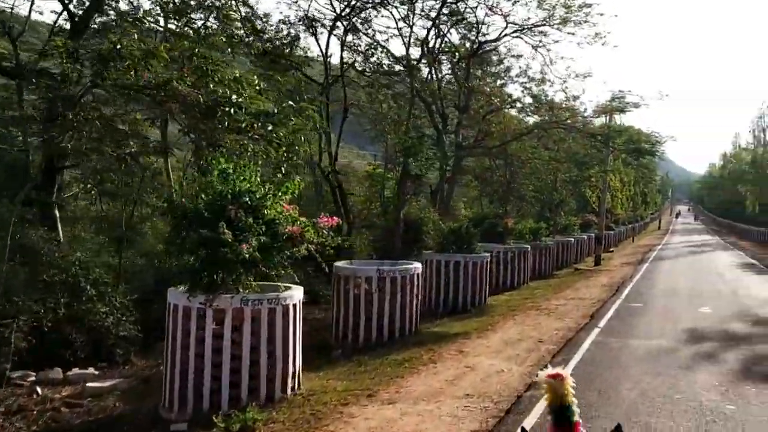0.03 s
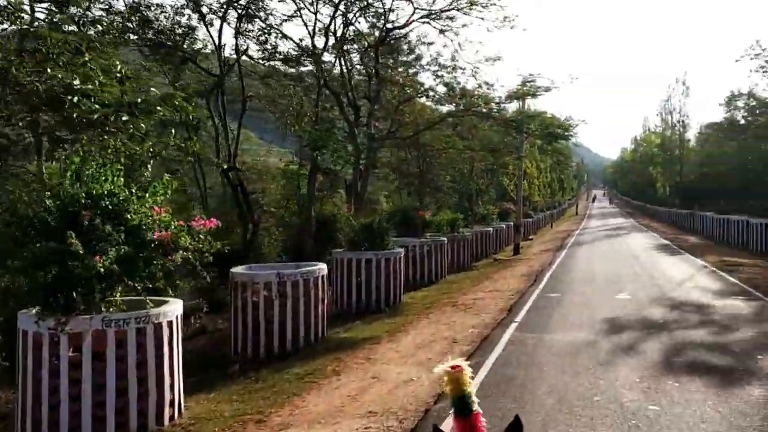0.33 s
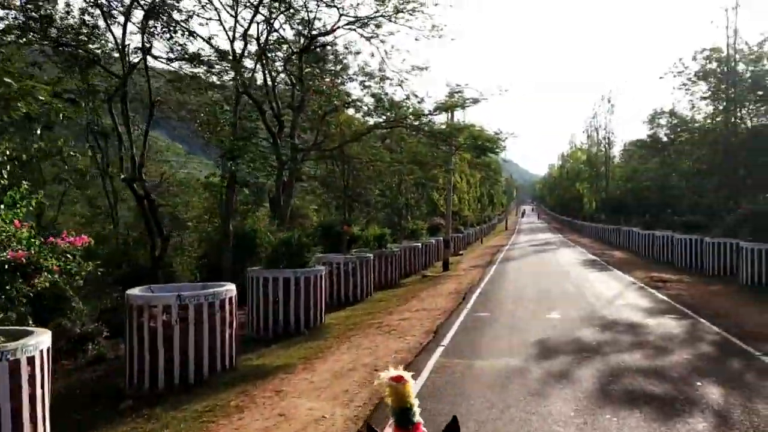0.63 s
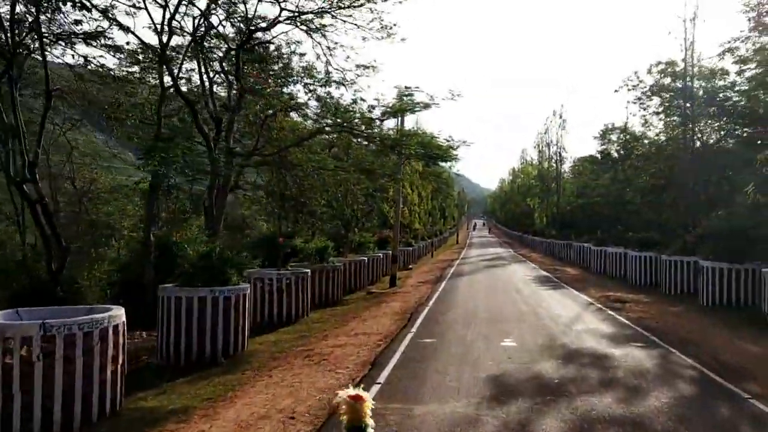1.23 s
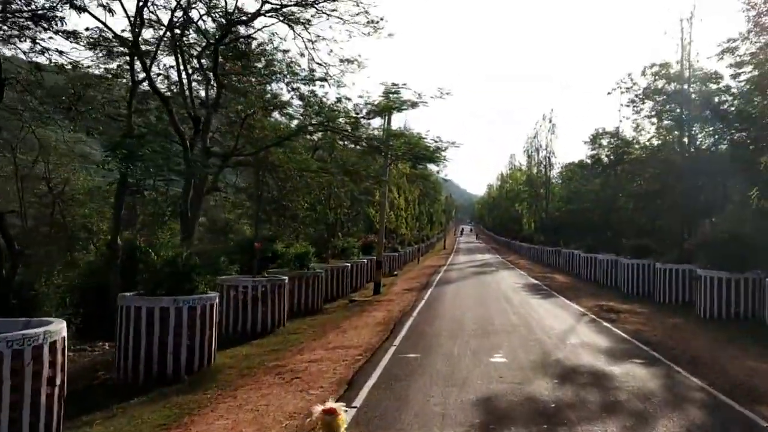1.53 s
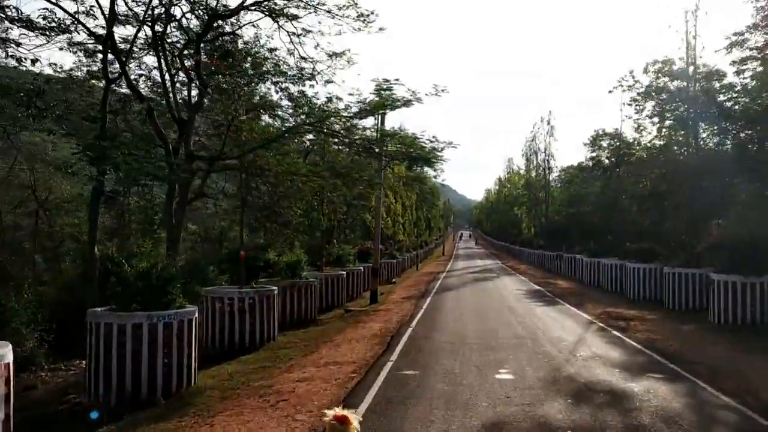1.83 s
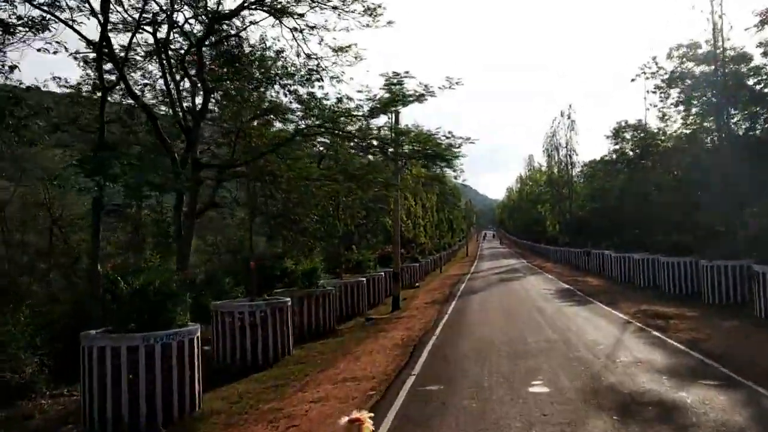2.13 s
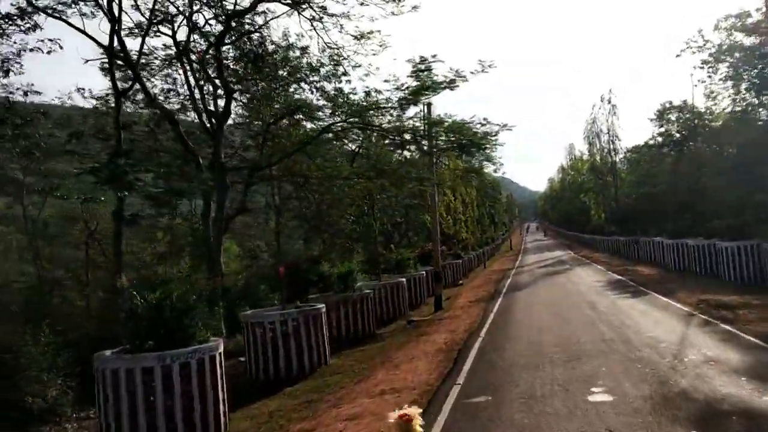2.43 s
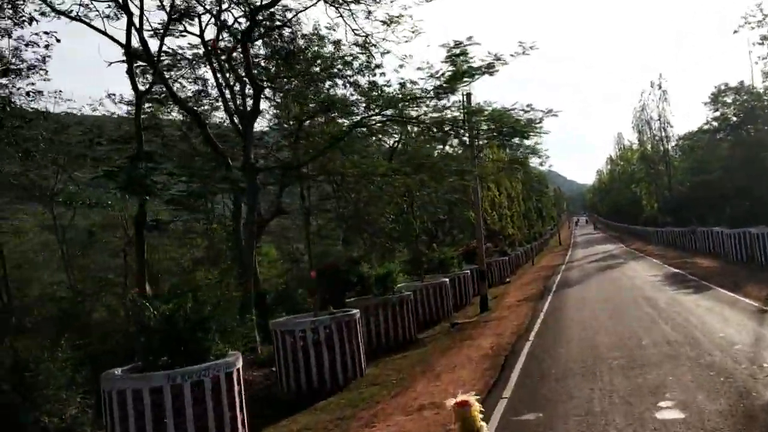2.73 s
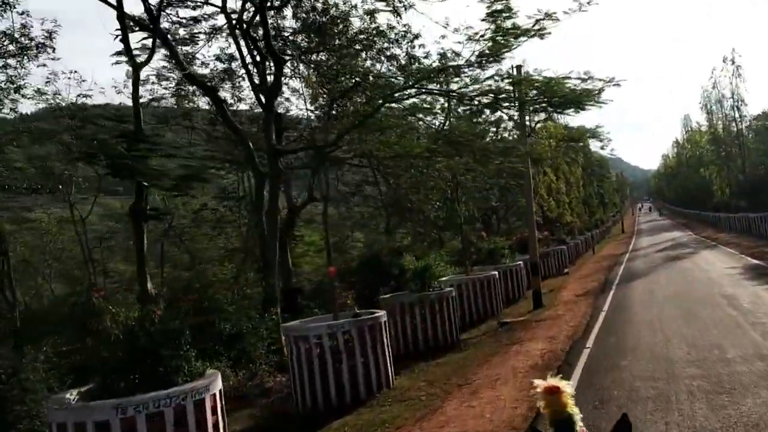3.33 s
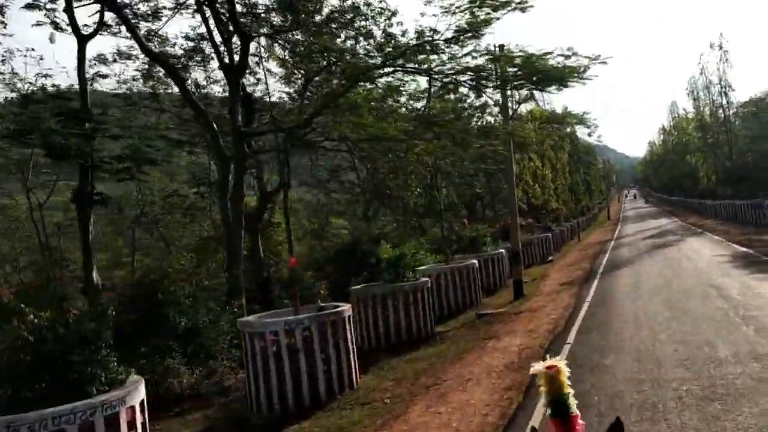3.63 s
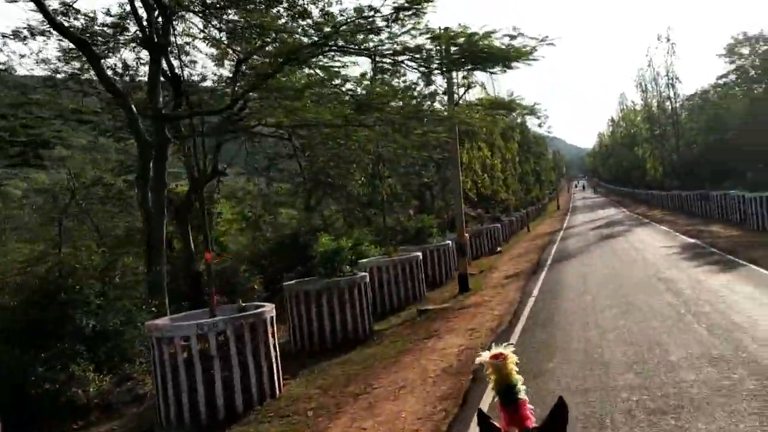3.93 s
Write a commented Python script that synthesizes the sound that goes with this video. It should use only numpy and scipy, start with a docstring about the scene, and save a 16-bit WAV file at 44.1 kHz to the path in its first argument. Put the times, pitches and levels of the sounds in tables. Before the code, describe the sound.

Harness bells jingle densely throughout, heard from a moving cart, with short, choked rings standing out from a shimmer of tiny bells. Dry hoofbeats trot steadily, nearly four a second, slightly left. Underneath, a faint rolling rumble and pulsing hum slowly sink, with two barely audible whines between 0.5 and 2 seconds. Bells clink hard together at about 2.9 seconds and again near 4 seconds.

```python
"""A draught animal trots along a paved road, heard from its cart. From the start the harness bells shake:
larger ones ring out and are choked as they touch again, over a dense jingle of tiny bells, with
rolling noise and a faint pulsing drone below. The hooves come straight in, each beat a cluster of dry
knocks. From half a second two faint whines swell and fade. Near three seconds, and again at the very
end, bell clinks hard against bell, while the road bed slowly sinks."""
import sys
import numpy as np
from scipy import signal
from scipy.fft import rfft, irfft, next_fast_len
from scipy.io import wavfile
from scipy.ndimage import uniform_filter1d, map_coordinates

SR = 44100
rng = np.random.default_rng(int(sys.argv[2]) if len(sys.argv) > 2 else 0)


def transcribe(u):
    """Save the signal u as a 16-bit wav file named by the first command-line argument.

    u: samples, shape (n,) or (channels, n), limited to [-1, 1]; the rate is SR.
    q: integer samples, one column per channel.
    """
    v = np.clip(np.atleast_2d(u).T, -1, 1)
    q = np.round(v * 32767).astype(np.int16)
    wavfile.write(sys.argv[1], SR, q)


N = 176400
T = np.arange(N) / SR


def amp(db):
    return 10 ** (np.asarray(db) / 20)


def unit(x):
    return x / np.sqrt(np.mean(np.abs(x) ** 2) + 1e-20)


def fade(t, t60):
    return np.exp(-np.log(1000) * t / t60)


def pan(left_db):
    return amp([[left_db / 2], [-left_db / 2]])


def wobble(rate):
    """A smooth random curve, rate knots a second."""
    return map_coordinates(rng.standard_normal(1024), [T * rate], mode="mirror")


def add(out, start_s, sound):
    """Drop a sound onto the track."""
    i = max(round(start_s * SR), 0)
    part = out[..., i:i + sound.shape[-1]]
    part += sound[..., :part.shape[-1]]


def coloured(x, eq):
    """x through an EQ curve of (frequency [Hz], gain [dB]), at rms 1."""
    hz, db = np.transpose(eq)
    f = np.fft.rfftfreq(N, 1 / SR)
    gain_db = np.interp(np.log(f + 1), np.log(hz), db, left=db[0] - 14, right=db[-1] - 31)
    return unit(irfft(rfft(x) * amp(gain_db), N))


def stereo_noise(width):
    mid, side = rng.standard_normal((2, N))
    return np.array([mid + width * side, mid - width * side])


# Fader ride of the shaking harness: (time [s], relative level [dB])
SHAKE_RIDE = [(0, -25.5), (.45, -26), (.62, -26), (1.33, -24.5), (1.41, -28.5), (1.5, -24), (1.91, -27.5),
              (2.35, -24.5), (2.52, -30), (2.65, -27.5), (3.3, -25.5), (4, -28.5)]


def shake_db():
    """How hard the harness shakes from moment to moment."""
    return np.interp(T, *np.transpose(SHAKE_RIDE))


def jostle(touches_per_s=45, swing_db=7, t60_s=0.22):
    """Envelope of a jostled bell: each contact retriggers the ring with a new size and phase."""
    touch = rng.random(N) < touches_per_s / SR
    age = T - np.maximum.accumulate(T * touch)
    size, phase = rng.standard_normal((2048, 2)).T
    onset = amp(swing_db * np.minimum(size, 1)) * np.exp(2j * np.pi * phase)
    return uniform_filter1d(onset[np.cumsum(touch)] * fade(age, t60_s), size=140)


# Bell strokes, loud and soft, that ring until choked: (time [s], free ring [s], relative level [dB])
STROKE_CUES = { "low": [(.143, 0.078, -28.5), (.782, 0.045, -18.5), (.932, 0.078, -30.5),
               (1.241, 0.057, -28.5), (1.55, 0.036, -28), (1.848, 0.018, -25), (2.595, 0.056, -26.5),
               (2.995, 0.12, -29.5), (3.79, 0.072, -32.5)], "middle": [(.027, 0.01, -21.5),
               (.293, 0.047, -27), (.585, 0.077, -28), (.843, 0.074, -27), (1.624, 0.1, -26.5),
               (1.939, 0.085, -28), (2.094, .03, -28), (2.17, 0.096, -26.5), (2.768, 0.061, -24.5),
               (3.03, 0.066, -32), (3.265, 0.021, -37), (3.57, 0.3, -37), (3.87, 0.12, -31)],
               "upper": [(1.226, 0.027, -23), (1.7, 0.078, -26.5), (2.277, 0.041, -20.5),
               (3.91, 0.045, -25.5)], "clear": [(.52, 0.046, -26), (3.26, 0.088, -26.5)],
               "bright": [(.29, 0.036, -27), (.51, .15, -31), (.87, 0.047, -22.5), (1.11, 0.054, -23.5),
               (1.446, 0.037, -19.5), (1.606, 0.083, -51), (2.172, 0.09, -17), (2.66, 0.095, -28.5),
               (2.945, 0.073, -26.5), (3.44, 0.51, -31)], "sharp": [(.21, 0.013, -16), (.675, 0.02, -12.5),
               (1.015, 0.035, -15.5), (2.35, 0.077, -17.5), (2.975, 0.03, -18.5)]}
# Brief tinkles, per bell: (relative level [dB], times [s])
TINKLE_CUES = {"dull": (-31.5, [.94, 1.848, 2.05, 2.417, 2.575]),
               "small": (-21, [.558, .699, .725, .987, 1.332, 1.56, 1.851, 2.048, 2.128, 2.319, 2.42, 2.79, 2.868, 2.946, 3.22, 3.855]),
               "fine": (-21.5, [.38, .79, .928, 1.245, 3.325, 3.425, 3.492]),
               "tiny": (-27, [1.33, 1.53, 1.575, 2.172, 2.28, 2.64, 2.775, 3.35, 3.759])}


def strokes(name, tinkle_s=0.023):
    """One bell's strokes and tinkles as (time [s], free ring [s], relative level [dB])."""
    db, times = TINKLE_CUES.get(name, (0, []))
    return STROKE_CUES.get(name, []) + [(start, tinkle_s, db) for start in times]


# Ringing modes, per bell: (frequency [Hz], relative level [dB])
BELL_MODES = { "low": [(3332, 0), (6180, -17)], "dull": [(3580, 0)], "middle": [(3720, 0), (7994, -8),
              (5846, -22)], "upper": [(3887, 0), (11483, -9)], "thin": [(6903, 0), (5346, -12)],
              "clear": [(7235, 0), (7378, -4)], "bright": [(8479, 0), (4587, -26)], "sharp": [(8626, 0),
              (11057, -14)], "small": [(10084, 0), (12581, -9)], "fine": [(13157, 0), (13900, -5)],
              "tiny": [(15100, 0), (14912, -3), (15606, -2), (14680, -5)]}
# Place in the mix, per bell: (jostle level [dB], left over right [dB], left phase lead [rad])
BELL_MIX = {"low": (-36.5, -1.8, -1.24), "dull": (-44.5, -9, 0), "middle": (-34.5, -6.5, 0.85),
            "upper": (-37.5, -6, 1.5), "thin": (-38.5, 0, 0), "clear": (-31.5, -4.5, 2.82),
            "bright": (-29, -6, -0.98), "sharp": (-31, -1.8, -2.06), "small": (-31, 1.4, 0.75),
            "fine": (-33.5, 2.7, 2.1), "tiny": (-38, 2.6, -0.58)}


def bell(name, stroke_db=1.5, free_t60_s=2.2, choke_t60_s=0.045, detune_hz=4.9, sway_rad=0.76):
    """One harness bell: light jostling under strokes that ring freely, chatter and are choked."""
    jostle_db, pan_db, lead_rad = BELL_MIX[name]
    t = np.arange(SR // 3) / SR
    attack = 1 - np.exp(-t / 0.00025)
    chatter_pole = np.exp(-1 / (0.0059 * SR))  # smooths the chatter over about 6 ms
    shaking = amp(shake_db())
    out = np.zeros(N, complex)
    for hz, mode_db in BELL_MODES[name]:
        out += amp(jostle_db + mode_db) * unit(shaking * jostle()) * np.exp(2j * np.pi * hz * T)
        for start, free_s, db in strokes(name):
            detune, phase = rng.standard_normal(2)
            noise = rng.standard_normal(len(t)) + 1j * rng.standard_normal(len(t))
            chatter = 1 + 0.15 * unit(signal.lfilter([1], [1, -chatter_pole], noise))
            ring = attack * fade(t - free_s / 2, free_t60_s)
            choke = fade(np.maximum(t - free_s, 0), choke_t60_s)
            tone = np.exp(2j * np.pi * ((hz + detune_hz * detune) * t + phase))
            add(out, start, amp(stroke_db + db + mode_db) * ring * choke * chatter * tone)
    sway = np.exp(0.5j * (lead_rad + sway_rad * wobble(11)))  # the stereo image wanders
    return np.sqrt(2) * pan(pan_db) * np.array([out * sway, out / sway]).real


def tiny_bells(eq, width_rad, partials_per_s=2000, t60_s=0.075, spread_db=8):
    """A swarm of brief metal contacts, each ringing with pitches of its own."""
    t = np.arange(SR // 25) / SR
    count = int(partials_per_s * N / SR)
    when, pitch, size, phase, lag = rng.random((count, 5)).T[..., None]
    when = when[np.arange(count) // 3]  # three partials to a contact
    hz = eq[0][0] + pitch * (eq[-1][0] - eq[0][0])
    envelope = amp(spread_db * size ** 2) * fade(t, t60_s)
    samples = ((when * N).astype(int) + np.arange(len(t))).ravel()
    channels = []
    for side in (1, -1):
        grains = envelope * np.sin(2 * np.pi * (hz * t + phase) + side * width_rad * (2 * lag - 1))
        channels.append(np.bincount(samples, grains.ravel(), N)[:N])
    return coloured(np.array(channels), eq)


# Bright body of the tiny bells: (frequency [Hz], gain [dB])
JINGLE_EQ = [(2500, -16.5), (3500, -12.5), (4700, -22), (6400, -23.5), (7300, -6), (8900, 3.5),
             (9900, -1.5), (10800, -4), (12000, -6.5)]


def jingle(trim_db=2.5):
    """A wide, dense bed of tiny bells that rides the shake of the harness."""
    return amp(shake_db() + trim_db) * tiny_bells(JINGLE_EQ, width_rad=1.38)


# Airy top of the tiny bells: (frequency [Hz], gain [dB])
SPARKLE_EQ = [(11000, 2), (12000, -57), (12700, 13), (14300, 8), (16000, 5)]


def sparkle(trim_db=-3):
    """The highest bells glitter in jostled flurries, left of centre."""
    flurries = unit(np.abs(jostle()))
    return amp(shake_db() + trim_db) * flurries * pan(5) * tiny_bells(SPARKLE_EQ, width_rad=1.8)


def metal_noise():
    """Bright noise in the colour of the bells, the raw sound of a metal contact."""
    return coloured(stereo_noise(1), JINGLE_EQ) + 0.5 * coloured(stereo_noise(0.75), SPARKLE_EQ)


def ticks(pellets_per_s=22, pellet_db=8, clapper_db=-13, t60_s=0.015):
    """Loose pellets rattle in the bells, and the clapper ticks on every stroke and tinkle."""
    decay = fade(np.arange(SR // 10) / SR, t60_s)
    pellets = (rng.random(N) < pellets_per_s / SR) * rng.random(N) * amp(shake_db() + pellet_db)
    envelope = signal.fftconvolve(pellets, decay)[:N]
    for name in BELL_MIX:
        for start, _, db in strokes(name):
            add(envelope, start, amp(db + clapper_db) * decay)
    return envelope * metal_noise()


def drone(surge_db, pulse_hz=44, body_hz=256.4, jitter=0.0154, uneven_db=2):
    """Uneven pulses ring one low resonance, like a motor some way off."""
    t = np.arange(SR // 10) / SR
    cycles = np.floor(np.cumsum(pulse_hz * (1 + jitter * wobble(30))) / SR)
    pulses = np.diff(cycles, prepend=0) * amp(uneven_db * wobble(18) + surge_db)
    body = np.sin(2 * np.pi * body_hz * t) * fade(t, 0.022) * (1 - np.exp(-t / 0.017))
    return unit(signal.fftconvolve(pulses, body)[:N])


# Rumble of the cart on the paving: (frequency [Hz], gain [dB])
ROAD_EQ = [(25, -8), (95, -24), (200, 7), (450, 3), (900, -3), (2500, -5.5), (6000, -83)]


def rolling(road_db=-40, drone_db=-41.5, stride_s=0.555, peak_s=1.465, fade_db_per_s=1.25):
    """The low bed: road noise and drone swell once a stride and slowly sink."""
    surge_db = 3 * np.cos(2 * np.pi * (T - peak_s) / stride_s)
    hum = amp(drone_db) * drone(surge_db)
    road = amp(road_db + wobble(23) + surge_db / 2) * coloured(stereo_noise(0.54), ROAD_EQ)
    return (hum + road) * amp(-fade_db_per_s * (T - 1.5))  # the fader passes unity at 1.5 s


# Hoof contacts, toe and heel: (time [s], relative level [dB])
HOOF_CUES = [(.118, -17), (.130, -17), (0.187, -19.5), (.391, -15), (.405, -12), (0.673, -18),
             (.688, -14.5), (0.94, -21), (0.958, -13.5), (1.216, -19), (1.230, -17.5), (1.486, -13.5),
             (1.506, -12.5), (1.765, -15), (1.77, -18.5), (2.037, -11.5), (2.045, -13), (2.053, -40),
             (2.319, -12.5), (1.846, -30), (2.576, -19.5), (2.594, -16.5), (2.858, -23), (2.887, -17),
             (3.136, -17.5), (3.154, -11), (3.409, -21), (3.441, -21.5), (3.693, -16.5), (3.712, -13),
             (3.968, -19.5), (3.988, -23)]
# Modes of the hoof's knock: (frequency [Hz], relative level [dB])
KNOCK_MODES = [(900, -11.5), (1170, -1), (1480, -7)]
# Grit under the hoof: (frequency [Hz], gain [dB])
SCUFF_EQ = [(200, -5), (600, -14.5), (1250, -2), (2000, -8.5), (5000, -17.5)]


def hooves(knock_db=1.5, knock_t60_s=0.012, scuff_db=-12, scuff_t60_s=0.07, pitch_scatter=0.042):
    """Each contact with the paving is a dead knock with a short gritty scuff, left of centre."""
    t = np.arange(SR // 6) / SR
    knock_envelope = fade(t, knock_t60_s) * (1 - np.exp(-t / 0.00017))
    knocks, scuff_envelope = np.zeros((2, N))
    for start, db in HOOF_CUES:
        pitches = np.exp(pitch_scatter * rng.standard_normal(len(KNOCK_MODES)))
        ring = sum(amp(mode_db) * np.sin(2 * np.pi * hz * pitch * t)
                   for (hz, mode_db), pitch in zip(KNOCK_MODES, pitches))
        add(knocks, start, amp(db + knock_db) * ring * knock_envelope)
        add(scuff_envelope, start, amp(db + scuff_db) * fade(t, scuff_t60_s))
    knocks = signal.sosfilt(signal.butter(2, 550, "high", fs=SR, output="sos"), knocks)
    scuffs = uniform_filter1d(scuff_envelope, size=500) * coloured(stereo_noise(0.31), SCUFF_EQ)
    return pan(6.5) * (knocks + scuffs)


# Faint tones over the road noise: (time [s], length [s], frequency [Hz], level [dB])
WHINE_CUES = [(0.507, 1.37, 730, -54), (.74, 0.18, 469, -41.5)]


def whines():
    """Thin tones that swell and fade at a steady pitch."""
    out = np.zeros(N)
    for start, length, hz, db in WHINE_CUES:
        t = np.arange(int(length * SR)) / SR
        swell = np.sqrt(2 * np.sin(np.pi * t / length))
        add(out, start, amp(db) * swell * np.sin(2 * np.pi * hz * t))
    return out


# Hard accents of bell against bell: (time [s], level [dB])
CLINK_CUES = [(2.868, -8), (3.11, -23), (3.984, -13)]


def clinks(ping_hz=9350, ping_t60_s=0.079, tick_db=-20, tick_t60_s=0.015):
    """Two bells collide: a high ping with a tick of noise on its attack."""
    t = np.arange(SR // 10) / SR
    ping = fade(t, ping_t60_s) * np.sin(2 * np.pi * ping_hz * t + [[0], [1]])  # right leads by 1 rad
    pings, tick_envelope = np.zeros((2, N)), np.zeros(N)
    for start, db in CLINK_CUES:
        add(pings, start, amp(db) * ping)
        add(tick_envelope, start, amp(db + tick_db) * fade(t, tick_t60_s))
    return pings + tick_envelope * metal_noise()


def scene():
    """Bells, cart and hooves together in the open air."""
    harness = sum(bell(name) for name in BELL_MIX) + jingle() + sparkle() + ticks()
    return harness + rolling() + hooves() + whines() + clinks()


def record(dry, top_hz=15950):
    """A brick-wall low-pass trims the very top of the mix."""
    padded = next_fast_len(N + SR // 4)
    f = np.fft.rfftfreq(padded, 1 / SR)
    return irfft(rfft(dry, padded) / (1 + (f / top_hz) ** 160), padded)[:, :N]


dry = scene()
out = record(dry)
transcribe(out)
```